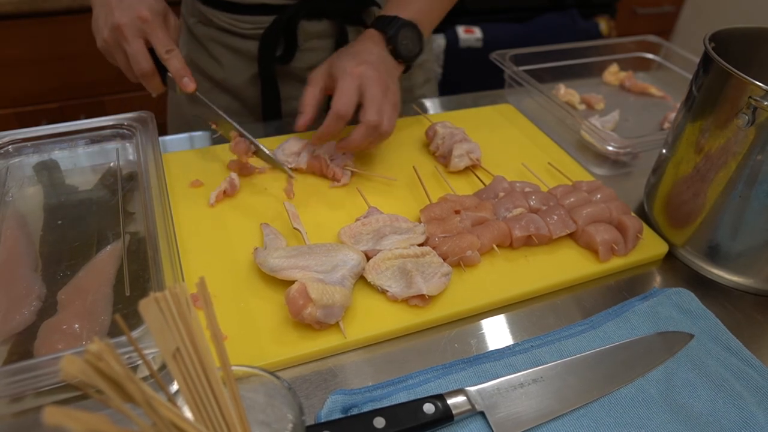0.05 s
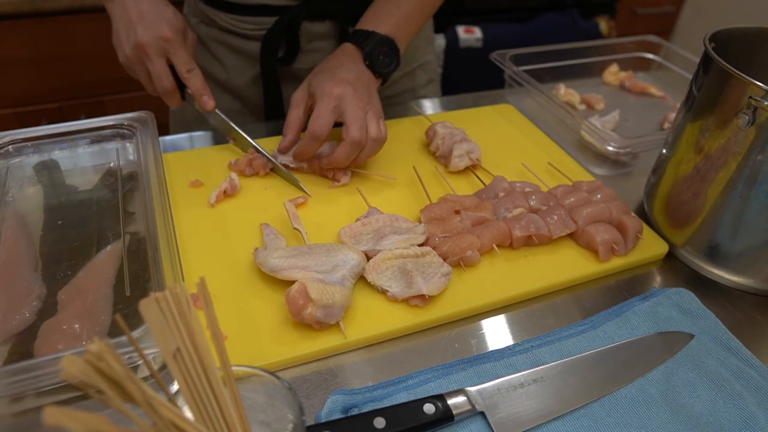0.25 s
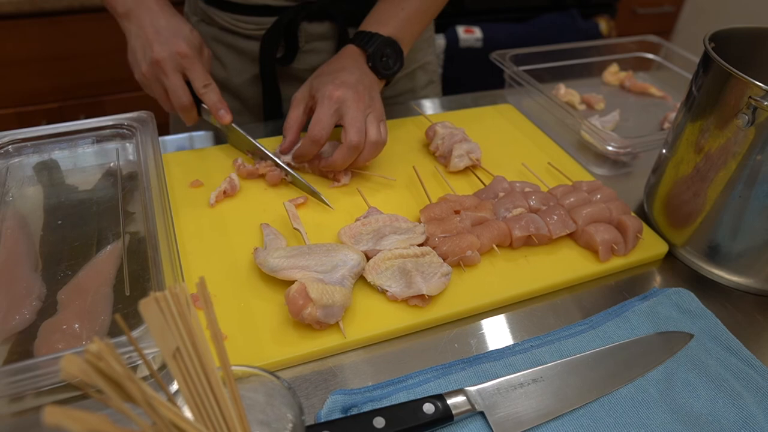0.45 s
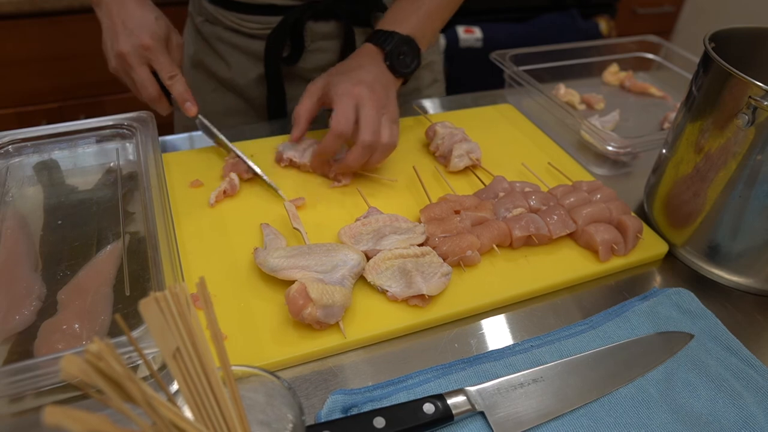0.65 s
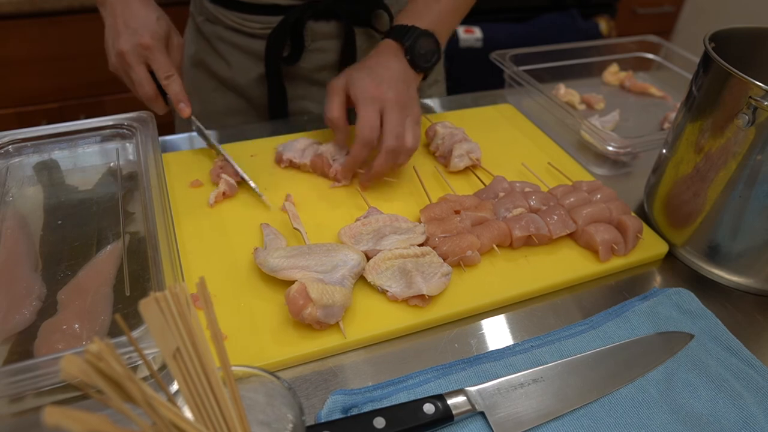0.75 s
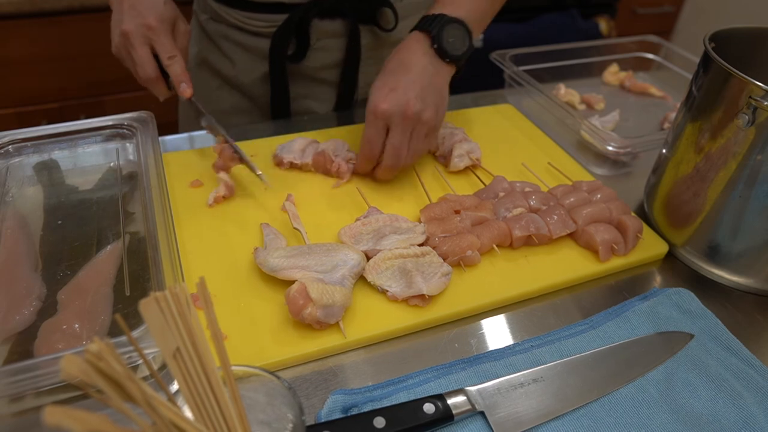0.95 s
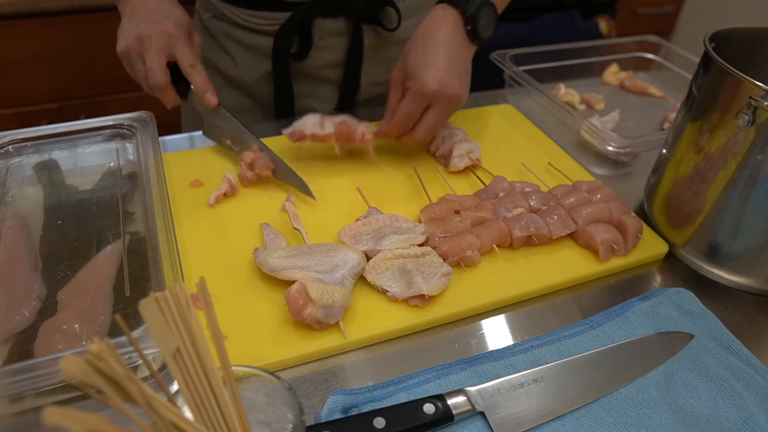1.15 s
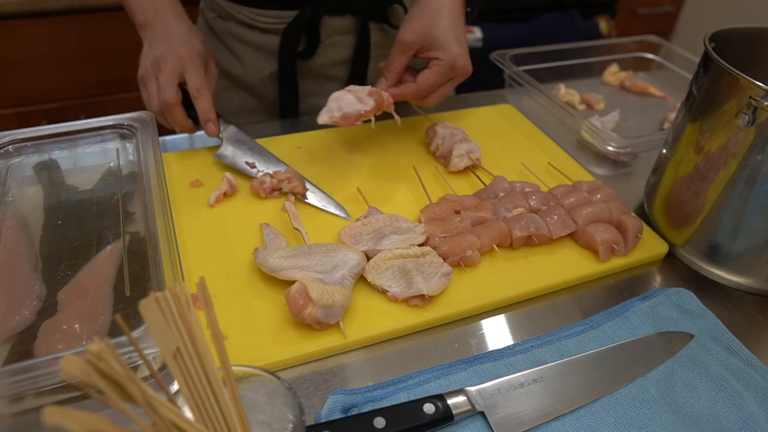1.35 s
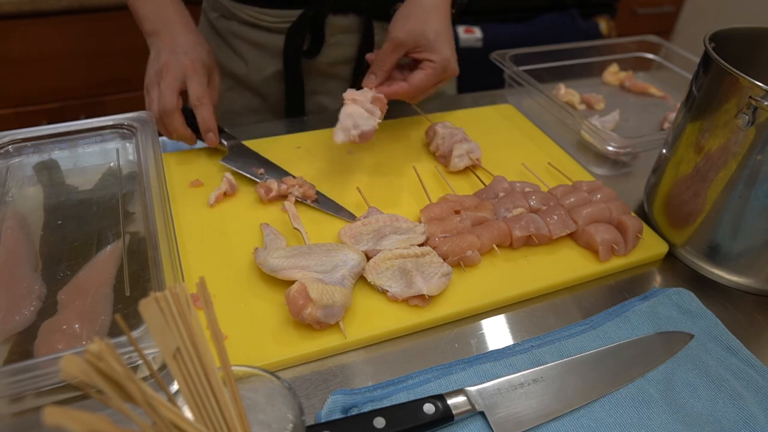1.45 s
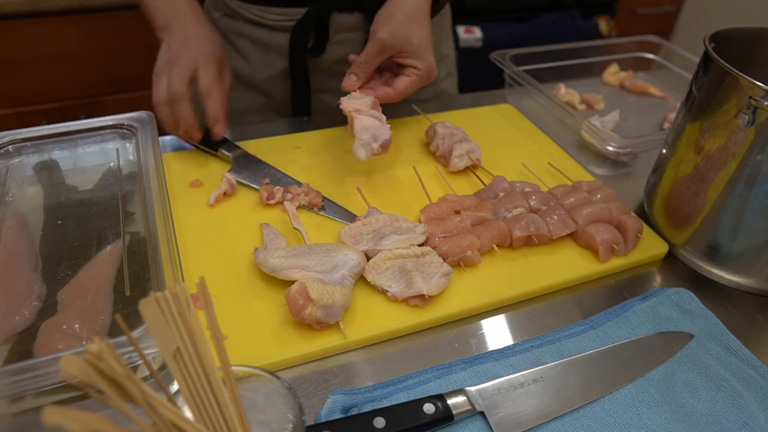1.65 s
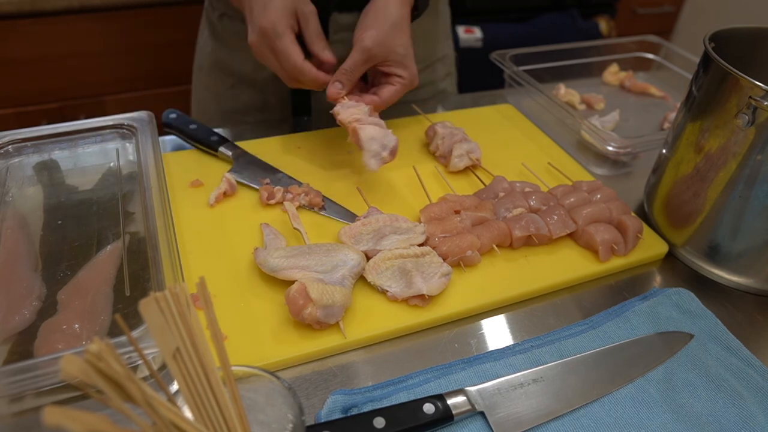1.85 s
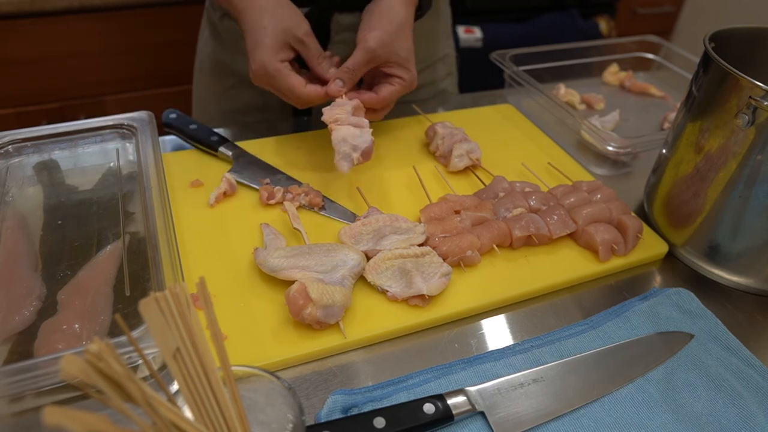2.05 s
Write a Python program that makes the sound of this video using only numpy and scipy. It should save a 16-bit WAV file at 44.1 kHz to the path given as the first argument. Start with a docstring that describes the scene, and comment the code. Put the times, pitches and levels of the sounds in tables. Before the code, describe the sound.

A knife edge knocks a plastic board, rasps across it, then lands flat and its handle knocks

```python
"""A kitchen knife trims raw chicken on a plastic board on a steel worktop, in a hard-walled kitchen.
The edge snaps onto the board, then scrapes with uneven slips, gritty noise and a low note.
The knife is laid down: the flat blade lands and slides with a hum, then bolster and handle knock.
Wet meat ticks and rubs softly as short bursts of noise; the worktop rings and thuds.
Steady filtered noise makes a low rumble, and reflections and a fading tail make the room."""
import sys
import numpy as np
from scipy import signal
from scipy.fft import rfft, irfft
from scipy.io import wavfile
from scipy.ndimage import uniform_filter1d

SR = 44100
rng = np.random.default_rng(int(sys.argv[2]) if len(sys.argv) > 2 else 0)


def generate_wav(signal):
    """Clip the signal to [-1, 1] and save it as 16-bit WAV at the path in sys.argv[1]."""
    frames = np.transpose(np.atleast_2d(signal))
    scaled = np.clip(frames, -1, 1) * 32767
    pcm = np.round(scaled).astype(np.int16)
    wavfile.write(sys.argv[1], SR, pcm)


N = 92610  # length in samples: 2.1 s
TOP_HZ = 15800  # upper limit of the crunch and of the finished sound

# tone colour of the cutting edge hitting the board: (pitch [Hz], level [dB])
EDGE = [(40, -15), (130, -13), (270, -4), (470, -5), (640, 0), (820, -0.5), (1250, -5.5), (1650, -17.5),
        (2350, -17), (3200, -30), (5000, -35.5), (8000, -46), (15000, -52.5)]
# tone colour of the flat blade landing: (pitch [Hz], level [dB])
FLAT = [(40, -23), (140, -3), (260, -3), (430, 5), (640, -2), (940, 2), (1200, -13), (1500, -8.5),
        (1800, -36), (3000, -22.5), (6000, -27.5), (10000, -33), (15000, -82)]
# tone colour of the handle landing: (pitch [Hz], level [dB])
HANDLE = [(40, -26), (140, -4), (210, 3.5), (290, -8.5), (375, 10.5), (520, 1), (690, 4.5), (870, -1),
          (1500, -1.5), (2150, -6), (2900, -12), (3500, -20.5), (5200, -27), (8000, -48.5), (15000, -61)]
# tone colour of the bolster, the thick part by the handle: (pitch [Hz], level [dB])
BOLSTER = [(40, -10), (400, 6), (900, -16.5), (1500, -12), (2900, 5), (3600, -23.5), (5500, -36),
           (8000, -48), (15000, -66)]
# ringing tones of the free blade: (pitch [Hz], level [dB], time to fall by 60 dB [s])
BLADE = [(2112, 10, 0.012), (2943, 0.5, 0.02), (3860, 1.5, 0.027), (5054, 3, 0.02), (7410, -12.5, 0.02),
         (7800, -11, 0.018), (9740, -5.5, 0.018), (11300, -15.5, 0.0089), (12100, -17, .018),
         (14350, -21, 0.0073)]
# tone colour of the edge rasping over plastic: (pitch [Hz], level [dB])
RASP = [(600, -9), (1700, 3.5), (2400, -3.5), (3000, 4), (3700, -10), (4400, 1.5), (5200, -12),
        (6000, -7.5), (8000, -22.5), (10500, -24.5), (15300, -25), (16000, -42)]


def amp(db):
    """Turns decibels into a gain."""
    return 10 ** (np.asarray(db) / 20)


def evened(x):
    """Scales a sound to an average (rms) strength of 1."""
    return x / np.sqrt(np.mean(x ** 2) + 1e-20)


def read(points, hz):
    """Reads a curve between its points, on a logarithmic pitch axis."""
    f, value = np.transpose(points)
    return np.interp(np.log(hz + 1), np.log(f + 1), value)


def add(mix, s, sound):
    """Mixes a sound in, starting at time s in seconds."""
    part = mix[max(round(s * SR), 0):][:len(sound)]
    part += sound[:len(part)]


def convolve(x, response):
    """Passes x through a response, keeping its length."""
    return signal.fftconvolve(x, response)[:len(x)]


def pulse(points, size=4096):
    """The sharpest click with this tone colour that has no sound before its start."""
    hz = abs(np.fft.fftfreq(size, 1 / SR))
    log_gain = np.log(amp(read(points, hz)))
    spectrum = np.exp(np.conj(signal.hilbert(log_gain)))
    return np.fft.ifft(spectrum).real[:size // 2]


def ring(modes):
    """A struck object's dying tones; each level is the gain at that tone's pitch."""
    t = np.arange(SR) / SR
    total = np.zeros(SR)
    for hz, db, t60 in modes:
        decay = np.log(1000) / t60  # 60 dB is a factor of 1000
        total += amp(db) * 2 * decay / SR * np.exp(-decay * t) * np.sin(2 * np.pi * hz * t)
    return total


def band(x, hz, octaves):
    """Keeps a bell-shaped band of pitches around hz."""
    f = np.fft.rfftfreq(len(x), 1 / SR)
    bell = np.exp(-.5 * (np.log2((f + 1) / hz) / octaves) ** 2)
    return irfft(rfft(x) * bell, len(x))


def room_tone():
    """Steady noise coloured into a low rumble with a thin hiss."""
    # tone colour of the quiet room: (pitch [Hz], level per Hz [dB])
    floor = [(10, -3), (32, 4), (65, -14), (140, -14), (260, -24), (700, -32), (2000, -37), (5000, -44),
             (15000, -55)]
    gain = amp(read(floor, np.fft.rfftfreq(N, 1 / SR)))
    noise = irfft(rfft(rng.standard_normal(N)) * gain, N)
    return amp(-52.5) * evened(noise)


def kitchen(x):
    """Sound bounces back as single reflections, quick scatter from pots and tubs, and a diffuse tail."""
    # first reflections: (delay [s], gain [factor])
    echoes = [(.0023, 0.63), (.0079, 0.59), (0.0132, -0.71), (0.022, 0.18), (0.0242, 0.3), (.039, -0.15)]
    # how long the tail lasts: (pitch [Hz], time to fall by 60 dB [s])
    room_t60 = [(100, 0.44), (400, 0.57), (1000, 0.72), (2800, .5), (7000, 0.63), (15000, 1)]
    # tone colour of the tail: (pitch [Hz], level [dB])
    room_colour = [(100, -0.5), (300, 1.5), (600, -0.5), (1200, -1.5), (2500, 1), (6000, 1), (15000, -7.5)]
    scatter_db, scatter_s, fade_in_s = -6.5, 0.016, 0.0096
    t = np.arange(SR) / SR
    # noise is split into pitches so that each can fade at its own rate
    hz, when, z = signal.stft(rng.standard_normal(SR), SR, nperseg=256)
    rate = np.log(1000) / read(room_t60, hz)[:, None]
    z = z * np.exp(-rate * when) * np.sqrt(2 * rate / SR)
    z = z * amp(read(room_colour, hz))[:, None]
    tail = signal.istft(z, SR, nperseg=256)[1][:SR]
    scatter = rng.choice([-1, 1], SR) * (rng.random(SR) < .1) * np.exp(-t / scatter_s)
    scatter = scatter / np.linalg.norm(scatter)
    response = (tail + amp(scatter_db) * scatter) * np.minimum(t / fade_in_s, 1)
    blur = np.hanning(7) / np.hanning(7).sum()  # softens each reflection slightly
    for delay, gain in echoes:
        add(response, delay, gain * blur)
    return convolve(x, response)


def thuds():
    """The worktop gives under the hands with a brief dull swing."""
    # pushes on the worktop: (start [s], level [dB], pitch [Hz], length [s])
    pushes = [(0.322, -41.5, 46.2, 0.068), (0.674, -28.5, 104, 0.011), (0.725, -49, 210, 0.0772),
              (1.2, -40.5, 42.7, 0.099), (1.571, -41.5, 41.3, 0.091), (1.821, -47, 66, 0.047)]
    out = np.zeros(N)
    for s, db, hz, length in pushes:
        t = np.arange(0, length, 1 / SR)
        swing = np.sin(2 * np.pi * hz * (length / 2 - t))
        add(out, s, amp(db) * np.hanning(len(t)) * swing)
    return out


def meat():
    """Sticky films snap in tiny noise ticks; meat and fingers slide as soft swells of noise."""
    # snapping films: (start [s], level [dB], centre pitch [Hz])
    ticks = [(0.0194, -58.5, 6800), (0.469, -60, 6470), (0.909, -60, 8480), (1.037, -57, 5300),
             (1.049, -59.5, 9180), (1.061, -51.5, 5710), (1.102, -47, 4770), (1.115, -58, 7850),
             (1.385, -52, 7640), (1.4275, -51, 6700)]
    # soft rubs: (middle [s], length [s], level [dB], centre pitch [Hz], width [octaves])
    rubs = [(0.097, 0.085, -63, 766, 0.85), (0.528, 0.11, -72, 5200, 0.16), (0.553, 0.11, -64.5, 1225, 1),
            (0.946, .035, -47.5, 516, 0.27), (1.076, 0.074, -68.5, 5740, 0.89),
            (1.172, 0.13, -62, 585, 0.62), (1.532, 0.034, -57, 1063, 0.32),
            (1.688, 0.16, -73.5, 7400, 0.64)]
    tick_octaves, tick_fade_s = 0.45, 0.0013
    out, t = np.zeros(N), np.arange(1024) / SR
    for s, db, hz in ticks:
        noise = evened(band(rng.standard_normal(len(t)), hz, tick_octaves))
        add(out, s, amp(db) * np.exp(-t / tick_fade_s) * noise)
    for s, length, db, hz, octaves in rubs:
        swell = np.hanning(int(length * SR))
        noise = evened(band(rng.standard_normal(SR), hz, octaves))
        add(out, s - length / 2, amp(db) * swell * noise[:len(swell)])
    return out


def grit():
    """Tiny catches of steel on scored plastic: clicks at random times with random strengths."""
    catches_per_s, spread_db = 2500, 4.5
    caught = rng.random(N) < catches_per_s / SR
    strength = amp(spread_db * np.minimum(rng.exponential(1, N), 3))
    return caught * rng.choice([-1, 1], N) * strength


def slipping(hz):
    """Counts the cycles of a nearly even stick-slip (gripping and letting go) along the curve hz."""
    jitter = 0.0189  # typical pitch wander, as a share of the pitch
    wander = evened(uniform_filter1d(rng.standard_normal(N), size=180))
    return np.cumsum(hz * (1 + jitter * wander)) / SR


def slide():
    """The blade settles flat: stick-slip hums with a gliding pitch, and grit makes the steel shimmer."""
    # the flat blade sliding after it lands: (time [s], level [dB], hum pitch [Hz])
    path = [(1.237, -43, 535), (1.269, -43.5, 522.7), (1.31, -43.5, 487.5), (1.338, -53.5, 425),
            (1.365, -47.5, 356.6), (1.386, -52.5, 369), (1.414, -50.5, 415), (1.435, -56, 395),
            (1.454, -60, 376)]
    ring_db, rasp_db = -18, -17.5  # compared with the hum
    sag_per_s = 0.3  # share of its pitch that the shimmer loses each second
    t = np.arange(N) / SR
    s, db, hz = np.transpose(path)
    hum = evened(np.sin(2 * np.pi * slipping(np.interp(t, s, hz))))
    shimmer = evened(convolve(np.diff(grit(), prepend=0), ring(BLADE)[:SR // 4]))
    # reading the shimmer ever more slowly lowers its pitch
    elapsed = np.maximum(t - s[0], 0)
    shimmer = np.interp(t - sag_per_s * elapsed ** 2 / 2, t, shimmer)
    rasp = evened(convolve(grit(), pulse(RASP)))
    on = (t > s[0]) & (t < s[-1])
    level = on * amp(np.interp(t, s, db))
    return level * (hum + amp(ring_db) * shimmer + amp(rasp_db) * rasp)


def squeal():
    """Where the edge grips evenly, the judder turns into a low note with three harmonics."""
    # even stick-slip: (time [s], pitch [Hz], first [dB], second [dB], third harmonic [dB])
    path = [(0.621, 368.8, -60, -66, -73), (0.636, 371, -55, -35.5, -47), (0.656, 370.4, -50, -39.5, -38),
            (0.686, 386.2, -53, -48.5, -56), (0.71, 384.1, -36, -44, -60), (0.745, 370.2, -39, -47, -58),
            (0.766, 353.7, -51.5, -42.5, -55), (0.797, 357.6, -43, -42, -56), (0.815, 358, -88, -68, -76)]
    t = np.arange(N) / SR
    s, hz, *levels = np.transpose(path)
    turns = slipping(np.interp(t, s, hz))
    note = np.zeros(N)
    for k, db in enumerate(levels, 1):
        harmonic = evened(np.sin(2 * np.pi * k * turns))
        note += amp(np.interp(t, s, db)) * harmonic
    return (t > s[0]) * (t < s[-1]) * note


def scrape():
    """The edge judders in uneven slips, deeper on its belly than its tip; grit rings the pressed blade."""
    # scraping stroke: (time [s], judder level [dB], rasp level [dB], judder pitch [Hz],
    # contact [0 = tip, 1 = belly])
    stroke = [(0.612, -87, -69, 801.9, 0), (0.622, -44, -47, 796.7, 0), (0.630, -43, -42.5, 800.8, 0.63),
              (0.634, -27, -38.5, 828.4, 0.11), (0.645, -30, -32.5, 951, 0.071),
              (0.675, -34, -36.5, 851.7, 0.065), (0.697, -39, -44.5, 597, 1),
              (0.727, -34, -52, 558.1, 0.61), (0.755, -37.5, -54.5, 601.7, 1), (0.779, -40, -44, 700, 1),
              (0.8, -40, -54, 704.4, 0.44), (0.83, -74, -57, 642.5, 1)]
    # ringing tones of the blade pressed on the board: (pitch [Hz], level [dB], time to fall by 60 dB [s])
    pressed = [(2100, 6, 0.05), (2860, 1, 0.034), (3306, 4, 0.051), (4374, 3, 0.027), (4526, 5.5, 0.027),
               (5750, 5.5, 0.027), (10640, 18.5, 0.026), (11500, 13, 0.046), (12980, 13, .04),
               (15150, 0, .022)]
    # tone colour of the judder at the tip: (pitch [Hz], level [dB])
    judder_tip = [(150, -33.5), (380, -12.5), (510, 13.5), (630, -8.5), (760, 4.5), (900, -6), (1120, 2),
                  (1280, -22), (2000, -27), (3500, -36)]
    # tone colour of the judder at the belly: (pitch [Hz], level [dB])
    judder_belly = [(120, -23), (210, 3), (290, -11.5), (375, 7), (440, 0), (540, 3.5), (640, 0), (740, 0),
                    (880, 0), (1250, -10), (2000, -11.5), (3500, -50)]
    pitch_jitter, roughness = .3, 0.59  # unevenness of slip timing and of slip strength
    t = np.arange(N) / SR
    s, judder_db, rasp_db, slip_hz, belly = np.transpose(stroke)
    on = (t > s[0]) & (t < s[-1])
    wander = evened(uniform_filter1d(rng.standard_normal(N), size=60))
    turns = np.cumsum(np.interp(t, s, slip_hz) * np.exp(pitch_jitter * wander)) / SR
    # one click each time a whole turn is completed
    slips = np.diff(np.floor(turns), prepend=0) * (1 + roughness * rng.standard_normal(N))
    slips = slips - slips.mean()
    tip = evened(convolve(slips, pulse(judder_tip)))
    deep = evened(convolve(slips, pulse(judder_belly)))
    share = np.clip(np.interp(t, s, belly), 0, 1)
    judder = (1 - share) * tip + share * deep
    rasp = convolve(grit(), pulse(RASP))
    rasp = evened(rasp + convolve(rasp, ring(pressed)))
    judder = judder * amp(np.interp(t, s, judder_db))
    rasp = rasp * amp(np.interp(t, s, rasp_db))
    return on * (judder + rasp)


def crunch(push):
    """Steel bites plastic in many tiny steps: treble keeps its level but spreads over milliseconds."""
    lowest_hz, spread_s = 3010, 0.0021
    r = np.exp(-2 / (spread_s * SR))
    pitches = np.linspace(lowest_hz, TOP_HZ, 18)
    step = pitches[1] - pitches[0]
    for hz in pitches + step * rng.uniform(-0.79, 1, len(pitches)):
        # an all-pass filter: it delays the pitches around hz without changing their level
        poles = np.array([1, -2 * r * np.cos(2 * np.pi * hz / SR), r * r])
        push = signal.lfilter(poles[::-1], poles, push)
    return push


def knocks():
    """Contacts push the board and ring worktop and blade; returns direct sound and the room's feed."""
    # knocks on the board: (time [s], push level [dB], worktop ring against the push [dB],
    # blade ring [dB], push sent to the room [dB], contact [tone colour])
    hits = [(0.2218, 21.5, 2.5, -39, 1, EDGE), (1.2199, 8.5, -1, -0.5, 1.5, FLAT),
            (1.5656, 1.5, -11, -41, -13.5, BOLSTER), (1.5671, 9.5, -1, -56, -1.5, HANDLE)]
    # ringing tones of board and worktop: (pitch [Hz], level [dB], time to fall by 60 dB [s])
    worktop_modes = [(134.2, 6, .6), (267, 11, 0.5), (377, 1, 0.38), (442, 10.5, 0.4), (498.3, 14.5, 0.57),
                     (541.2, 10, 0.52), (695.6, 15.5, 0.31), (838, 6.5, .35), (872, 9, 0.3), (952, 6, 0.26),
                     (1016, 8.5, 0.33), (1266, 3, 0.86), (1514, 10, 0.33), (2116, 16, .33)]
    blade_room_db = -7.5  # less of the blade's ring reaches the walls
    direct, feed = np.zeros(N), np.zeros(N)
    worktop, blade = ring(worktop_modes), ring(BLADE)
    for s, db, worktop_db, blade_db, room_db, contact in hits:
        push = -amp(db) * crunch(pulse(contact))
        clink = amp(blade_db) * crunch(blade)
        add(direct, s, push)
        add(direct, s, clink + amp(worktop_db) * convolve(worktop, push))
        add(feed, s, amp(room_db) * push)
        add(feed, s, amp(blade_room_db) * clink)
    return direct, feed


def scene():
    """Knife, meat and worktop in the kitchen, as one channel."""
    direct, feed = knocks()
    handling = scrape() + squeal() + slide() + meat()
    near = direct + amp(-1.5) * handling
    reflected = kitchen(feed + amp(-7.0) * handling)
    return (near + reflected + thuds() + room_tone())[None]


def record(dry):
    """The recorder's band limit: a low-pass filter removes the highest treble."""
    low_pass = signal.firwin(511, TOP_HZ, window=("kaiser", 9), fs=SR)
    return signal.oaconvolve(dry, low_pass[None], "same")


dry = scene()
out = record(dry)
generate_wav(out)
```